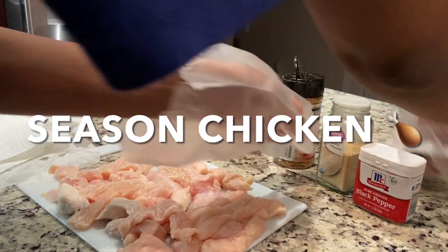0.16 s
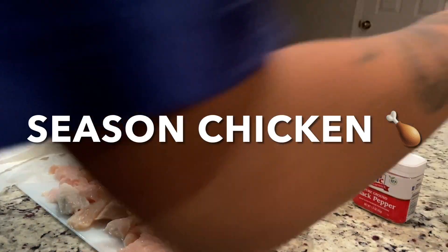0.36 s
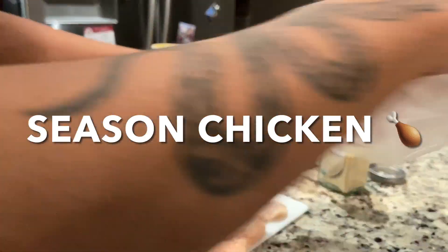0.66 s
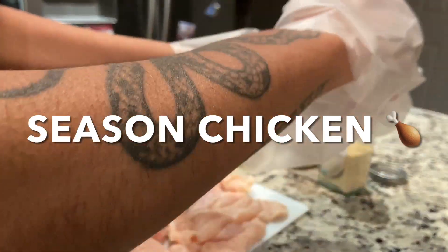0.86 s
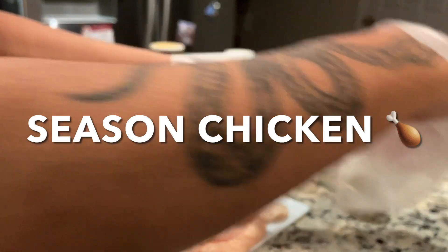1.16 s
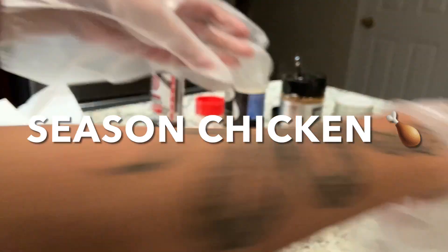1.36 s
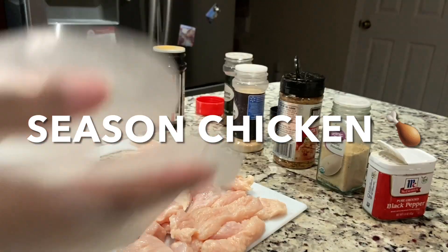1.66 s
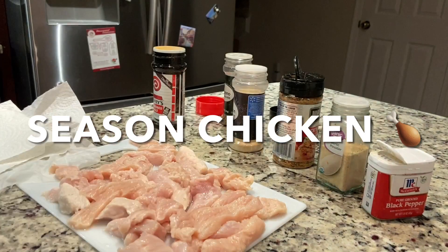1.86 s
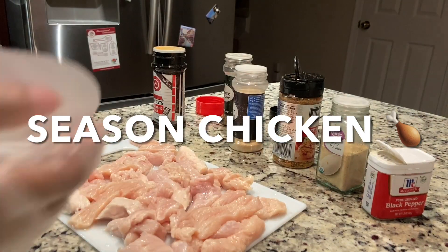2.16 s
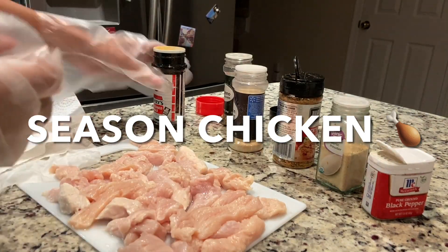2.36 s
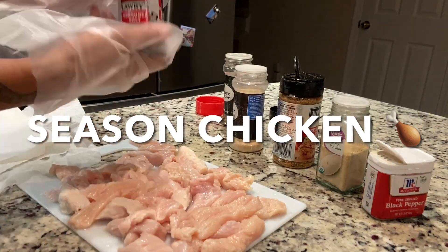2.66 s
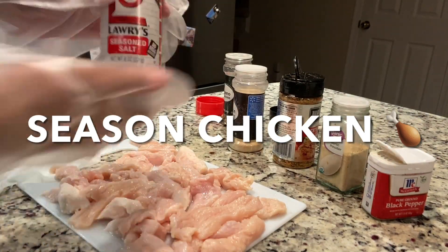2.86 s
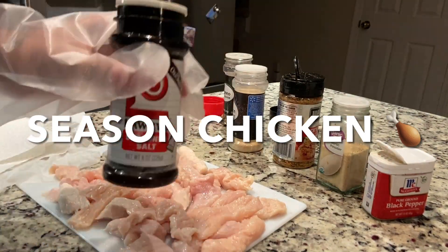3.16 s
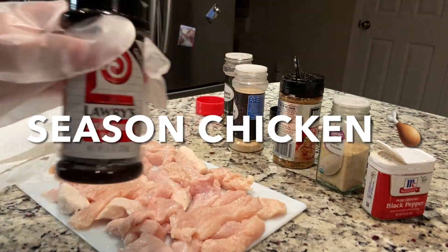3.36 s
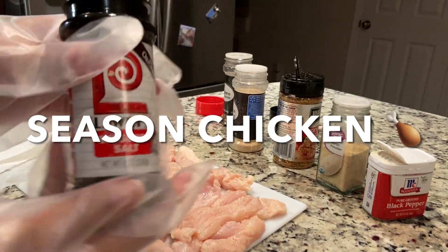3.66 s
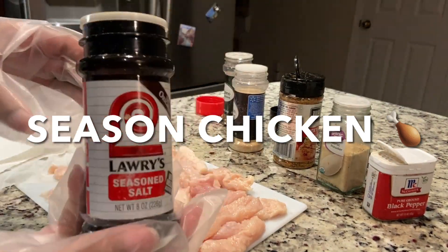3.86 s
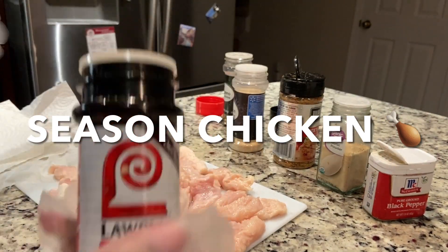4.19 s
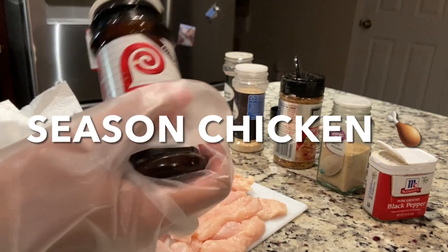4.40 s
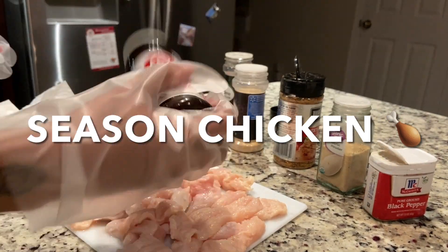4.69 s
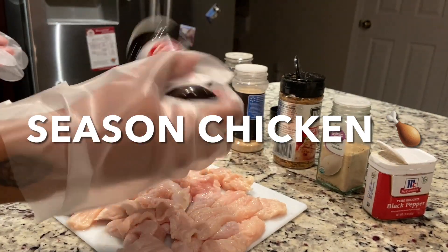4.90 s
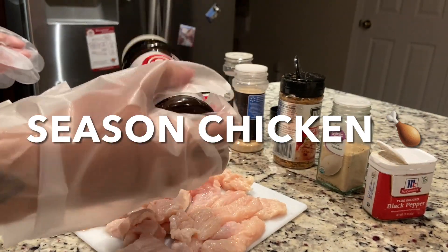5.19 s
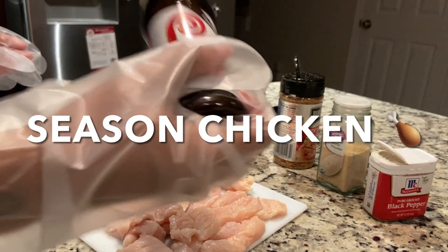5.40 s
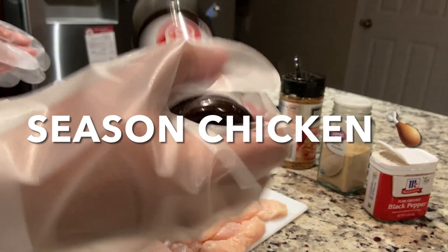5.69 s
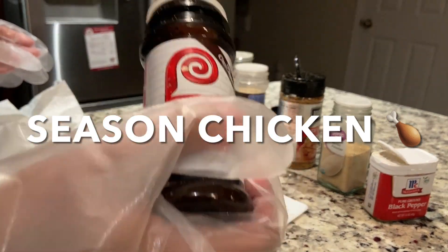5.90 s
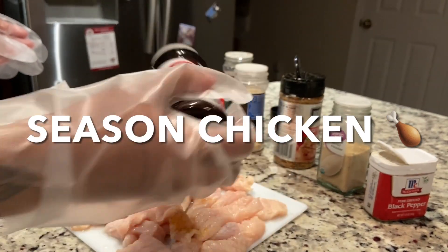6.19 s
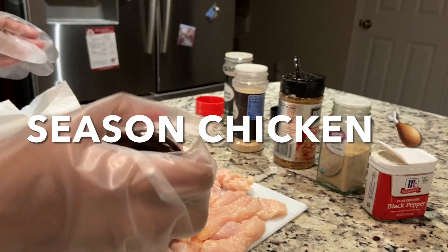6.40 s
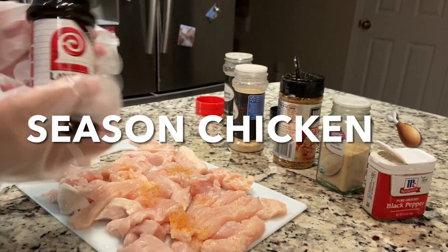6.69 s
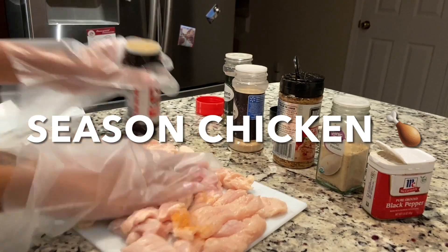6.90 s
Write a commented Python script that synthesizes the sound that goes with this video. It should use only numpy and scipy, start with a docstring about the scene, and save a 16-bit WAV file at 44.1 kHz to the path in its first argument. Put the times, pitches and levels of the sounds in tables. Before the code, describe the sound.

A close phone microphone in a small kitchen with short, bright reflections and a faint, slightly unsteady refrigerator hum over room air. Thin plastic gloves rustle from the start, over the stopped tail of a ringing jar. At 0.27-0.4 s two glass jars clink in a quick, bright cluster. Crinkling swells around 0.5-0.8 s; a very sharp lid click lands at 0.9 s and a loud, hollow pop at 1.3 s. From 1.6 to 2.3 s the film crackles densely, with crisp snaps and soft flapping. Salt hisses in a shaker at 2.7 s, fading, and more faintly at 3.3 s. Rustles return at 3.5-4.2 s, then stay sparse and quiet, with tiny ticks and small crinkles until about 6.4 s. Crackling surges from 6.7 s with sharp high snaps, and a low, short knock on stone at 6.95 s ends the action amid final rustling.

```python
"""Thin plastic gloves at a kitchen counter

Close to a phone, gloved hands make film crackle and flap: damped clicks and hiss, coloured by size of fold.
Two glass jars clink and a lid clicks and pops shut: decaying sine modes under short bursts of noise.
Salt, a crowd of tiny clicks, slides in a hollow shaker that is then set down on stone with a falling knock.
A refrigerator hums in unsteady sines over room air; the kitchen answers with a short decaying-noise echo."""
import sys
import numpy as np
from scipy import signal
from scipy.fft import rfft, irfft, next_fast_len
from scipy.io import wavfile
from scipy.ndimage import uniform_filter1d, map_coordinates

SR = 44100
rng = np.random.default_rng(int(sys.argv[2]) if len(sys.argv) > 2 else 0)


def wav_record(signal):
    """Record a signal, one row per channel, as 16-bit PCM in the file named by sys.argv[1]."""
    frames = np.transpose(np.atleast_2d(signal))
    bounded = np.clip(frames, -1, 1)
    # unit amplitude maps onto the largest positive 16-bit level
    quanta = np.round(bounded * 32767).astype(np.int16)
    wavfile.write(sys.argv[1], SR, quanta)


N = 310905


def amp(db):
    """Gain of a level in dB."""
    return 10 ** (np.asarray(db) / 20)


def unit(x):
    """x at rms 1."""
    return x / np.sqrt(np.mean(x ** 2) + 1e-20)


def along(points, hz):
    """(Hz, value) points read on a log frequency axis."""
    f, v = np.transpose(points)
    return np.interp(np.log(hz + 1), np.log(f + 1), v)


def filtered(x, gain):
    """x times a gain that depends on frequency."""
    m = next_fast_len(N + 8192)
    return irfft(rfft(x, m) * gain(np.fft.rfftfreq(m, 1 / SR)), m)[:N]


def wobble(rate):
    """A smooth random curve, rate knots a second."""
    knots = rng.standard_normal(int(N * 200 / SR) + 4)
    return map_coordinates(knots, [np.arange(N) * rate / SR])


def add(track, s, sound):
    """Mix a sound into the track from time s in seconds."""
    part = track[round(s * SR):][:len(sound)]
    part += sound[:len(part)]


def grains(count, mid_hz, spread, cycles, scatter_db):
    """Tiny damped clicks at random times; pitches log-normal, a few much larger than the rest."""
    u = rng.random((count, 3))  # columns: time, size, phase
    k = np.arange(64)
    hz = np.clip(mid_hz * np.exp(spread * rng.standard_normal(count)), 300, 17000)[:, None]
    size = amp(-scatter_db * np.log(u[:, 1:2] + .02))
    turns = hz * k / SR
    shape = size * np.sqrt(hz) * np.exp(-turns / cycles) * np.sin(2 * np.pi * (turns + u[:, 2:]))
    places = (u[:, :1] * N).astype(int) + k
    return unit(np.bincount(places.ravel(), shape.ravel(), minlength=N)[:N])


def blow(modes, rise, colour, crack, rattle):
    """One strike: modes ring down over a short crack and a longer rattle, each (dB, t60 s), of coloured noise."""
    t = np.arange(SR // 4) / SR
    ring = sum(amp(db - 60 * t / t60) * np.sin(2 * np.pi * hz * t) for hz, db, t60 in modes)
    tint = amp(along(colour, np.fft.rfftfreq(len(t), 1 / SR)))
    noise = unit(irfft(rfft(rng.standard_normal(len(t))) * tint, len(t)))
    fall = amp(crack[0] - 60 * t / crack[1]) + amp(rattle[0] - 60 * t / rattle[1])
    return (ring + fall * noise) * (1 - np.exp(-t / rise))


def fridge():
    """Slightly unsteady motor tones over the steady air of the room."""
    # Each row: tone in Hz, mean level in dB rms, rate of its unsteadiness in knots a second.
    motor = [(235, -83.5, 6), (480.4, -68, 2.4), (1841, -84.5, 10)]
    # Colour of the room air. Each row: frequency in Hz, relative level in dB per Hz.
    air_colour = [(24, -65), (40, -39), (124, -11), (392, -12.5), (479, -4.5), (570, -12), (715, -9.5),
                  (831, -13.5), (1590, -19), (1850, -16), (2320, -24.5), (14800, -32.5), (16000, -35.5)]
    air_db = -66
    t = np.arange(N) / SR
    tones = 0
    for hz, db, rate in motor:
        level = np.sqrt(2) * amp(db + .8 * wobble(rate))
        tones = tones + level * np.sin(2 * np.pi * hz * t + .6 * wobble(rate))
    air = unit(filtered(rng.standard_normal(N), lambda f: amp(along(air_colour, f))))
    return tones + amp(air_db + .6 * wobble(4.5)) * air


def effort():
    """Crackle level in dB: each rustle of the gloves swells, holds and fades; their powers add."""
    # Each row: full strength from in seconds, crackle in dB, swell in s per 20 dB, hold in s, fade in s per 20 dB.
    rustles = [(0, -51, .05, 0.038, .06), (0.05, -48.5, 0.031, 0.034, 0.77),
               (0.495, -43.5, 0.053, 0.013, .045), (0.589, -42.5, 0.017, 0.042, 0.16),
               (0.681, -49.5, .03, 0.056, 0.15), (0.793, -50.5, .04, .025, 0.11),
               (0.994, -50, 0.037, 0.11, 0.12), (1.111, -44, .015, 0.027, .05),
               (1.165, -40, 0.046, 0.024, .03), (1.22, -51.5, 0.034, 0.056, 0.12),
               (1.372, -50, 0.049, .01, 0.093), (1.567, -53.5, 0.069, .03, .05),
               (1.62, -43.5, 0.016, 0.043, .05), (1.686, -39.5, 0.03, .01, .03),
               (1.737, -39.5, 0.027, 0.037, 0.034), (1.821, -47.5, 0.032, 0.063, 0.067),
               (2.04, -45, 0.052, 0.1, 0.068), (2.085, -43, .015, .006, .025),
               (2.187, -42, 0.041, 0.007, .04), (2.234, -57, .03, 0.052, 0.21),
               (2.4, -56.5, 0.027, 0.013, .03), (2.426, -54.5, .015, 0.022, 0.048),
               (2.518, -59.5, 0.045, 0.099, 0.11), (2.681, -44.5, 0.039, .03, 0.2),
               (2.84, -54, .04, .05, 0.072), (2.955, -60, .03, 0.073, .05),
               (3.104, -60.5, 0.017, 0.072, .025), (3.407, -59, 0.026, 0.055, .06),
               (3.525, -56, 0.024, 0.013, .04), (3.559, -46.5, 0.019, 0.0093, 0.026),
               (3.605, -52, 0.016, .2, 0.029), (3.82, -64.5, .03, .015, .09),
               (3.663, -49, 0.043, 0.059, .05), (4.04, -54, 0.011, .04, .05),
               (4.09, -45, 0.072, 0.018, 0.087), (4.252, -68.5, .025, .04, 0.031),
               (4.333, -60, 0.036, .01, 0.15), (4.45, -63, 0.031, .01, 0.036), (4.56, -66, 0.043, .01, .04),
               (4.61, -68.5, .015, 0.0096, .03), (4.724, -60, .03, .05, 0.066),
               (4.883, -61.5, 0.024, .015, 0.029), (4.92, -60.5, 0.022, 0.073, 0.043),
               (5.084, -61, .015, .025, .03), (5.124, -52, .03, .015, 0.058), (5.33, -69.5, .05, .03, .05),
               (5.481, -58.5, .07, .015, 0.057), (5.73, -62.5, .04, .04, 0.036),
               (5.785, -52.5, .04, 0.009, 0.1), (5.94, -67.5, 0.031, 0.025, .05),
               (6.153, -56, .06, 0.0085, 0.037), (6.198, -62, .015, .004, 0.024),
               (6.298, -66, .03, .01, .04), (6.407, -54, 0.024, .03, .04), (6.439, -48, .03, 0.0083, 0.059),
               (6.57, -63.5, 0.054, .06, 0.055), (6.641, -53.5, .03, 0.009, .06),
               (6.73, -42.5, 0.023, 0.014, 0.063), (6.782, -42, 0.066, 0.016, .11),
               (6.85, -51, .04, 0.039, .04), (6.919, -39.5, 0.022, 0.013, 0.036),
               (6.957, -48.5, .03, 0.035, 0.041), (7.011, -46, .025, .01, 0.078)]
    rest_db = -82.5  # a hand held still
    t = np.arange(N) / SR
    power = np.full(N, amp(2 * rest_db))
    for s, db, swell, hold, fade in rustles:
        first = max(0, round((s - 2 * swell) * SR))
        near = slice(first, round((s + hold + 2 * fade) * SR))
        away = np.maximum((s - t[near]) / swell, (t[near] - s - hold) / fade).clip(0)
        power[near] += amp(2 * (db - 20 * away))
    return 10 * np.log10(power)


def film(spectrum, clicks, click_share, clump):
    """Sliding hiss and any clicks, coloured for one size of fold, in clumps; the colour shifts in patches."""
    share = np.clip(click_share, 0, 1)
    mix = np.sqrt(share) * clicks + np.sqrt(1 - share) * rng.standard_normal(N)
    z = signal.stft(mix, nperseg=128)[2]
    patches = uniform_filter1d(rng.standard_normal(z.shape), size=7, axis=0)  # smooth over frequency
    patches = uniform_filter1d(patches, size=14, axis=1)  # and over time
    raw = signal.istft(z * amp(2.4 * unit(patches)), nperseg=128)[1][:N]
    return unit(clump * filtered(raw, lambda hz: amp(along(spectrum, hz))))


def gloves():
    """Small creases crackle high, broad folds lower (higher when pulled tight), and loose film pushes air."""
    # How the film hangs. Each row: time in seconds, broad folds in dB re crackle, flapping in dB re crackle,
    # tightness of the folds from 0 to 1, extra top in dB re crackle.
    hang = [(0, 1, -14, 0.55, -14), (.1, -7, -14.5, 0.4, -12), (.49, -3.5, -13, 0.16, -14),
            (.7, -6.5, -13, .7, -23), (1.2, -7, -17, .6, -25), (1.65, -5, -12.5, 0.62, -9),
            (1.77, -4.5, -3.5, 0.52, -10), (2.1, -6.5, -9.5, 0.38, -10), (2.45, -3, -5, 0.36, -11),
            (2.7, -5, -13.5, 0.49, -12), (3.15, -9.5, -15, 0.29, -7.5), (3.56, -1.5, -8.5, 0.28, -6),
            (3.66, -5, -15, 0.53, -5), (3.8, -3, -7.5, 0.23, -6), (4.1, -6.5, -17, 0.53, -2.5),
            (4.4, -3, -10.5, .4, -5), (5.1, -8.5, -23, .5, -12), (5.8, -6, -17, 0.44, -9),
            (6.45, -7.5, -23, .5, -6), (6.76, -9, -18, 0.6, -3), (6.93, -2.5, -12, 0.33, -4),
            (7.05, -1, -2, 0.3, -8)]
    # Colours of small creases, slack folds, tight folds and flapping.
    # Each row: frequency in Hz, relative level in dB per Hz.
    fine_colour = [(2500, -29.5), (5000, -7.5), (8000, -2), (11000, -1), (14000, -2), (17000, -2.5)]
    slack_colour = [(300, -28.5), (800, -2), (1800, -5), (3000, -7.5), (6000, -16), (12000, -34)]
    tight_colour = [(600, -29), (2000, -8.5), (4000, -1), (6000, -3), (9000, -17.5), (14000, -28.5)]
    flap_colour = [(50, -41), (130, -5.5), (300, -3), (600, -3), (1200, -10.5), (3000, -35.5)]
    top_from_hz = 10600  # the finest wrinkles sound above this
    s, *cols = np.transpose(hang)
    broad_db, flap_db, tight, top_db = [np.interp(np.arange(N) / SR, s, c) for c in cols]
    fine_db = effort()
    slip = wobble(53)  # the film gives way in jerks that all folds share

    creases = grains(count=14000, mid_hz=8950, spread=0.44, cycles=1.3, scatter_db=6.5)
    fine = film(fine_colour, creases, 0.22, amp(1.6 * slip + 2.2 * wobble(150)))
    top = filtered(fine, lambda hz: 1 / (1 + (top_from_hz / (hz + 1)) ** 8))
    fine = amp(-1.5) * fine + amp(top_db) * top

    folds = grains(count=9000, mid_hz=3500, spread=.6, cycles=1.1, scatter_db=1.0)
    clump = amp(1.7 * slip + 2.2 * wobble(90))
    turn = np.pi / 2 * np.clip(tight, 0, 1)  # crossfade from slack to tight
    broad = np.cos(turn) * film(slack_colour, folds, 0.56, clump)
    broad += np.sin(turn) * film(tight_colour, folds, 0.33, clump)

    flap = film(flap_colour, 0, 0, amp(2.0 * slip + 0.83 * wobble(30)))
    # a few sharp ticks as bent film relaxes, heard even when the hands barely move
    ticks = grains(count=900, mid_hz=9500, spread=0.48, cycles=.9, scatter_db=5.0)
    # larger creases letting go
    pops = grains(count=800, mid_hz=4996, spread=0.65, cycles=.7, scatter_db=3.5)
    crackle = amp(fine_db) * (fine + amp(broad_db) * broad + amp(flap_db) * flap)
    return amp(0.51 * fine_db - 44) * ticks + amp(0.69 * fine_db - 30) * pops + crackle


def clinks():
    """Two jars rattle; each touch rings both, then that ringing is damped, the wall-bending modes most."""
    # Glass on glass. Each row: start in seconds, level in dB, low modes in dB, second jar in dB, seconds of
    # free ringing before that touch's ringing is damped.
    touches = [(.2685, -35, -3, 0, .022), (0.2755, -33.5, -4, -1.5, .03), (0.3247, -26.5, 4, -13, .022),
               (0.3265, -25.5, 4, -3.5, .021), (.349, -28.5, -8, -10, .02), (0.3682, -27.5, 3, 2.5, .023),
               (0.3979, -32, -7.5, 12, .07)]
    # Mode pitches of the first and second jar, in Hz.
    first_hz = [2775, 5372, 8415, 9760, 10012, 10208, 10250, 12310, 15220, 15330]
    second_hz = [3665, 10629, 11840]
    # The same modes in order. Each row: mean level in dB, t60 in seconds.
    first_modes = [(-12.5, 0.15), (-12, 0.11), (-14, .08), (-7, 0.1), (-8, 0.1), (-4.5, 0.15), (-9, 0.107),
                   (-16, 0.08), (-5, .05), (-8, .06)]
    second_modes = [(-10, 0.05), (-7, 0.1), (-35, 0.042)]
    # Noise of the glass contact. Each row: frequency in Hz, relative level in dB per Hz.
    chink = [(1000, -9), (3000, -9), (8000, 4.5), (16000, 3.5)]
    # A jar struck just before still rings until a hand stops it: pitch in Hz, level in dB, t60 in seconds.
    earlier_hz, earlier_db, earlier_t60 = (2290, -42, 0.36)
    stopped_s = .048
    out, t = np.zeros(N), np.arange(SR // 4) / SR
    held = np.clip((stopped_s - t) / .004, 0, 1)
    add(out, 0, amp(earlier_db - 60 * t / earlier_t60) * np.sin(2 * np.pi * earlier_hz * t) * held)
    for s, db, low_db, second_db, free in touches:
        modes = [(hz, *m) for hz, m in zip(first_hz, first_modes)]
        modes += [(hz, level + second_db, t60) for hz, (level, t60) in zip(second_hz, second_modes)]
        # every touch excites the modes a little differently
        modes = [(hz, level + rng.normal(0, 3.5), t60) for hz, level, t60 in modes]
        low = sum(amp(level - 60 * t / t60) * np.sin(2 * np.pi * hz * t)
                  for hz, level, t60 in modes if hz < 5000)
        high = blow([m for m in modes if m[0] >= 5000],
                    rise=0.00036, colour=chink, crack=(8, .006), rattle=(-9, .09))
        touched = np.clip((t - free) / .003, 0, 1)
        add(out, s, amp(db) * (amp(-6 * touched) * high + amp(low_db - 15 * touched) * low))
    return out


def snaps():
    """Each crease buckles with a click of about two cycles, in a flurry that swells fast and dies slower."""
    # Single creases that snap through. Each row: start in seconds, level in dB, pitch in Hz.
    creases = [(.045, -33.5, 3700), (0.066, -26, 10300), (.2059, -36, 4960), (.5838, -33, 2010),
               (.647, -27, 8000), (0.7131, -27.5, 9200), (.7333, -31, 4730), (.7573, -34, 9800),
               (0.786, -28.5, 7300), (.7951, -31, 10800), (0.815, -35, 9400), (1.0326, -23, 7240),
               (1.1275, -22.5, 12000), (1.3749, -24.5, 9220), (1.5667, -33.5, 5300), (1.6035, -28, 9600),
               (1.6245, -26, 7600), (1.6532, -31, 9900), (1.6863, -19.5, 8500), (1.6913, -25.5, 4300),
               (1.7252, -26, 7100), (1.7381, -28, 4770), (1.754, -21, 8700), (1.7624, -22, 11300),
               (1.7791, -26, 8900), (1.819, -27, 9800), (1.8898, -33, 12300), (2.0083, -33.5, 11900),
               (2.0286, -27.5, 10400), (2.0907, -25.5, 3830), (2.1224, -26, 8800), (2.1672, -23.5, 8100),
               (2.197, -17, 8750), (2.2279, -32.5, 7400), (2.2922, -31, 9400), (2.401, -31.5, 12360),
               (2.8524, -31, 11900), (2.8684, -31.5, 5350), (2.8838, -29, 12750), (2.8997, -36, 10200),
               (2.9668, -28, 9900), (3.027, -36.5, 7300), (3.1002, -37.5, 9300), (3.4189, -28, 10500),
               (3.4266, -34, 11540), (3.4555, -35, 10360), (3.5633, -29, 4800), (3.6455, -21, 12600),
               (3.6861, -25, 11300), (3.7158, -27, 11500), (3.807, -30, 10250), (3.8597, -42, 10400),
               (3.924, -42, 11300), (4.0244, -41, 12600), (4.0394, -34, 12000), (4.0514, -34, 6130),
               (4.1255, -29, 9500), (4.149, -26.5, 10960), (4.2737, -38, 12900), (4.2841, -40, 13000),
               (4.437, -43, 8300), (4.8171, -47.5, 2880), (4.8864, -38, 11000), (4.9732, -38.5, 10700),
               (5.13, -30, 10740), (5.4877, -36.5, 8600), (5.5569, -40, 8330), (5.712, -37, 12800),
               (5.7905, -29.5, 8700), (5.8579, -42.5, 5200), (5.9034, -31, 14700), (5.945, -42.5, 8730),
               (6.078, -43.5, 11400), (6.1617, -31, 13200), (6.4385, -27, 12940), (6.4795, -40, 4330),
               (6.5944, -39, 12100), (6.6047, -38, 12800), (6.6101, -35, 13200), (6.6171, -38, 11160),
               (6.6455, -34, 12700), (6.723, -27, 13200), (6.7341, -22, 11700), (6.7995, -22, 13500),
               (6.8081, -15.5, 14600), (6.92, -20, 11200), (6.9893, -33, 8140), (7.0144, -30, 5600)]
    flurry_db = -19  # lesser creases around each snap, re its level
    out, t = np.zeros(N), np.arange(-SR // 100, SR // 30) / SR
    chance = rng.standard_normal((len(creases), len(t)))
    swell = np.where(t < 0, np.exp(t / 0.0018), np.exp(-t / 0.0024))
    for (s, db, hz), noise in zip(creases, chance):
        turns = hz * np.maximum(t, 0)
        click = 4 * turns * np.exp(-1.5 * turns) * np.sin(2 * np.pi * turns)
        bright = np.diff(noise, prepend=0)
        click += 0.28 * amp(-60 * t.clip(0) / 0.0012) * (t >= 0) * bright
        click += .06 * amp(-60 * t.clip(0) / .003) * (t >= 0) * noise[::-1]  # the duller push of the fold
        spiky = noise * np.abs(np.roll(noise, 99))
        rough = unit(np.diff(spiky, prepend=0) + .8 * noise)
        add(out, s + t[0], amp(db) * (click + amp(flurry_db) * swell * rough))
    return out


def lid():
    """The catch clicks, then the hollow lid pops shut: two strikes, each with its own modes and noise."""
    # The catch, then the lid closing: start in seconds, level in dB.
    click_s, click_db = (.9049, -5)
    pop_s, pop_db = (1.3042, -1.5)
    # Modes of the catch and of the lid. Each row: pitch in Hz, level in dB re the strike, t60 in seconds.
    catch_modes = [(520, -25.5, 0.037), (860, -29, 0.032), (3300, -9, 0.0026), (4870, 7.5, 0.0025),
                   (7430, -0.5, 0.0031), (13500, 0, 0.0026)]
    lid_modes = [(460, -31, 0.06), (829, -16, .06), (1080, -16, .015), (1870, 2.5, 0.018),
                 (1950, -10.5, .07), (2220, -15, .03), (3730, -18.5, 0.018)]
    # Noise of the catch and of the lid. Each row: frequency in Hz, relative level in dB per Hz.
    rasp = [(200, -34), (800, -7.5), (2500, -10.5), (5500, -3.5), (9000, -7), (16000, -13.5)]
    clack = [(250, -43.5), (800, -12), (1400, -12), (1950, -3.5), (2700, -10), (4500, -14), (9000, -23),
             (16000, -34)]
    out = np.zeros(N)
    click = blow(catch_modes, rise=0.00025, colour=rasp, crack=(-9, .005), rattle=(-23, .11))
    pop = blow(lid_modes, rise=0.00035, colour=clack, crack=(-10, .012), rattle=(-21, .13))
    add(out, click_s, amp(click_db) * click)
    add(out, pop_s, amp(pop_db) * pop)
    return out


def shaker():
    """Salt hisses through the hollow's resonances; at the end the base knocks the stone slab."""
    # Salt slides. Each row: start in seconds, level in dB rms before rise and decay, rise in s, t60 in s.
    slides = [(2.671, -41, 0.018, 0.57), (3.287, -53, 0.0024, 0.23)]
    # The shaker's air. Each row: centre in Hz, width in Hz, level in dB, before the summed curve is sharpened.
    resonances = [(4320, 1200, 1.5), (10000, 1100, -5), (15000, 2700, -0.5)]
    # The shaker meets the counter: start in seconds, level in dB.
    thud_s, thud_db = (6.9468, -17)
    # Modes of the shaker. Each row: pitch in Hz, level in dB re the thud, t60 in seconds.
    body_modes = [(143, -11.5, 0.068), (294, -16, 0.29), (460, -5.5, 0.026)]
    # Noise of the knock. Each row: frequency in Hz, relative level in dB per Hz.
    bump = [(70, -31), (300, 0), (600, -10), (1200, -18), (3000, -15.5), (9000, -34)]
    out, hiss, t = np.zeros(N), np.zeros(N), np.arange(SR // 4) / SR
    slow = np.arange(SR) / SR
    for s, db, rise, t60 in slides:
        add(hiss, s, amp(db - 60 * slow / t60) * np.clip(slow / rise, 0, 1))

    def hollow(f):
        """Summed resonance peaks of the air inside, sharpened by a power."""
        return sum(amp(db) * w / np.hypot(2 * (f - c), w) for c, w, db in resonances) ** 1.46

    salt = grains(count=40000, mid_hz=6040, spread=0.56, cycles=0.67, scatter_db=4.5)
    # bending waves in the slab: high frequencies arrive first, so the knock sweeps down
    sweep_hz = 420 + 2600 * np.exp(-t / 0.0008)
    sweep = np.sin(2 * np.pi * np.cumsum(sweep_hz) / SR)
    knock = amp(-60 * t / 0.027) * (1 - np.exp(-t / 0.001)) * sweep
    body = blow(body_modes, rise=0.0015, colour=bump, crack=(-14, .02), rattle=(-16, .12))
    add(out, thud_s, amp(thud_db) * (1.14 * knock + body))
    return out + hiss * unit(filtered(salt, hollow))


def kitchen(x):
    """The walls answer after about 3 ms; each frequency dies at its own speed."""
    # Each row: frequency in Hz, t60 in seconds.
    decay = [(300, 0.14), (2000, 0.17), (6000, 0.24), (15000, 0.22)]
    hz, t, z = signal.stft(rng.standard_normal(SR // 2), SR, nperseg=256)
    tail = signal.istft(z * amp(-60 * t / along(decay, hz)[:, None]), SR, nperseg=256)[1]
    delayed = np.pad(x, (130, 0))
    return signal.fftconvolve(delayed, tail / np.linalg.norm(tail))[:N]


def scene():
    """Gloves close by, jars a little further into the room, so they send more into the echo."""
    hands, glass, plastic = gloves() + snaps(), clinks(), lid() + shaker()
    echo = kitchen(amp(-16.0) * hands + amp(-4.5) * glass + amp(-11.5) * plastic)
    return (hands + glass + plastic + echo + fridge())[None]


def record(dry):
    """The phone's microphone drops the deep bass and fades out at the top of its band."""
    # Each row: frequency in Hz, gain in dB.
    response = [(20, -64), (70, -21), (120, -4), (15700, 0.5), (16000, -22), (16800, -57.5)]
    top_hz = 16990  # nothing passes from here up
    return filtered(dry[0], lambda hz: amp(along(response, hz)) * (hz < top_hz))[None]


dry = scene()
out = record(dry)
wav_record(out)
```